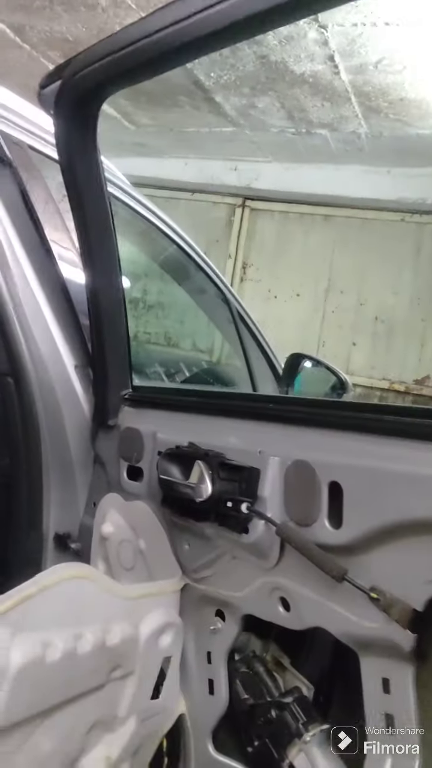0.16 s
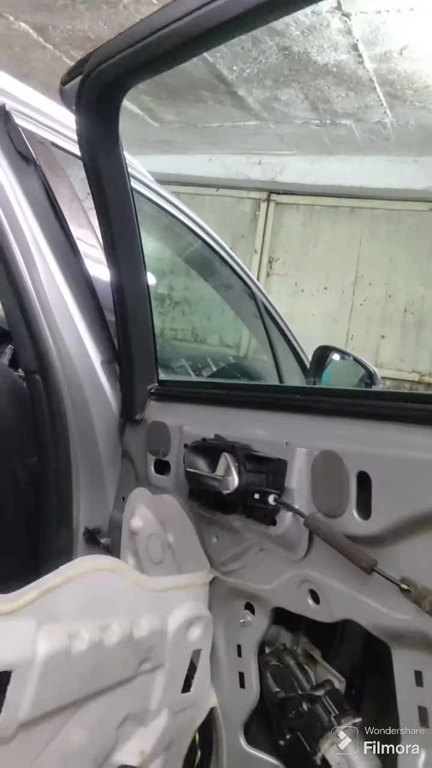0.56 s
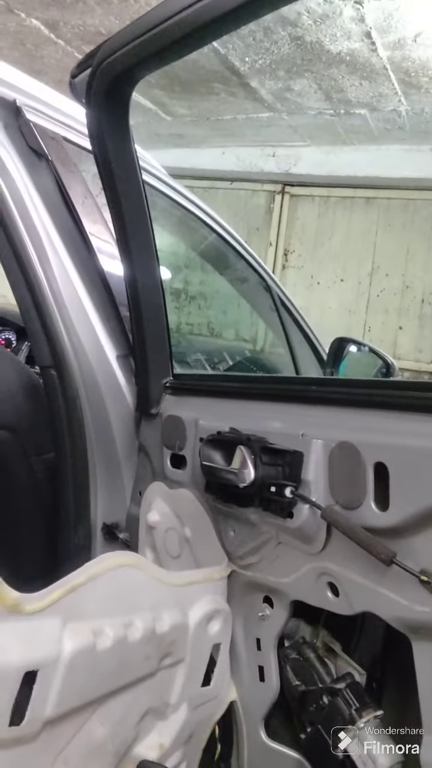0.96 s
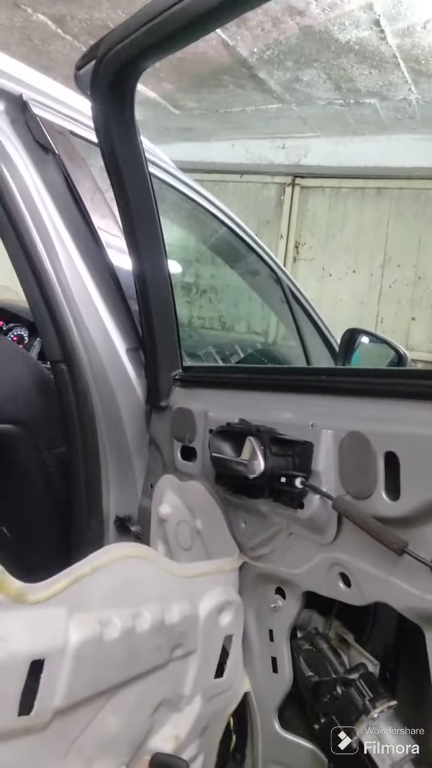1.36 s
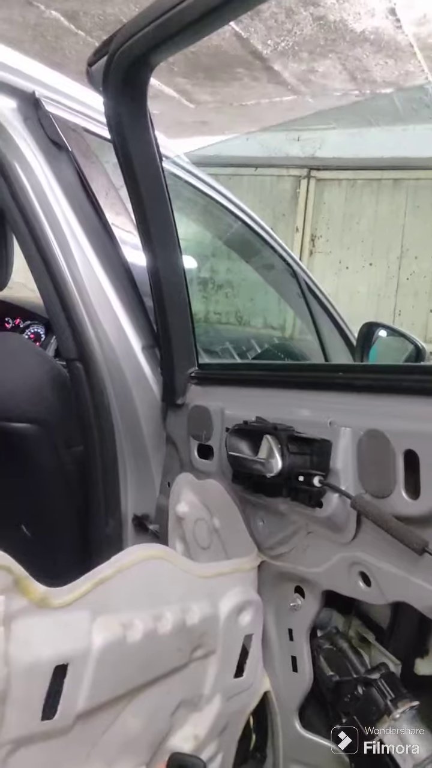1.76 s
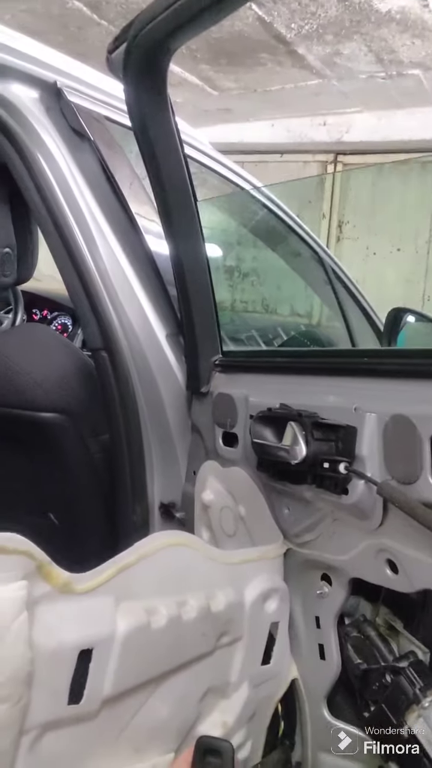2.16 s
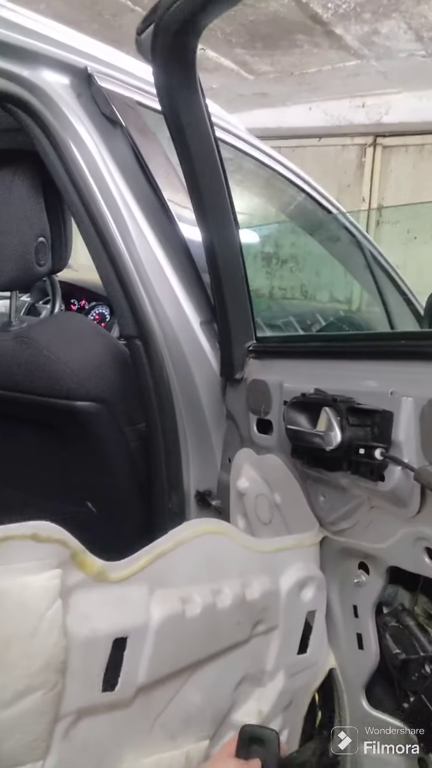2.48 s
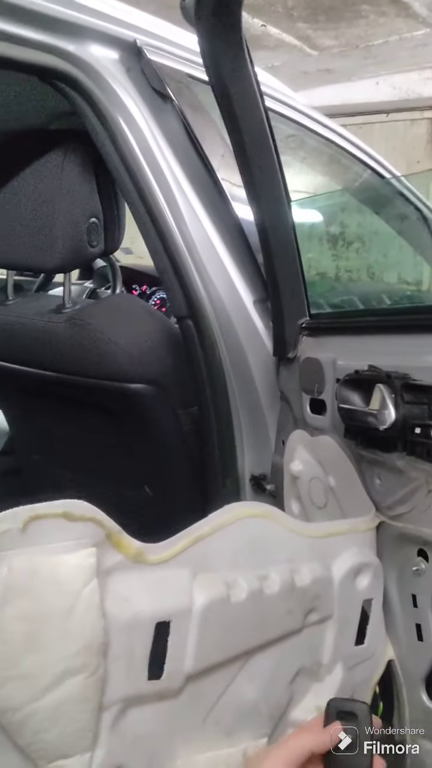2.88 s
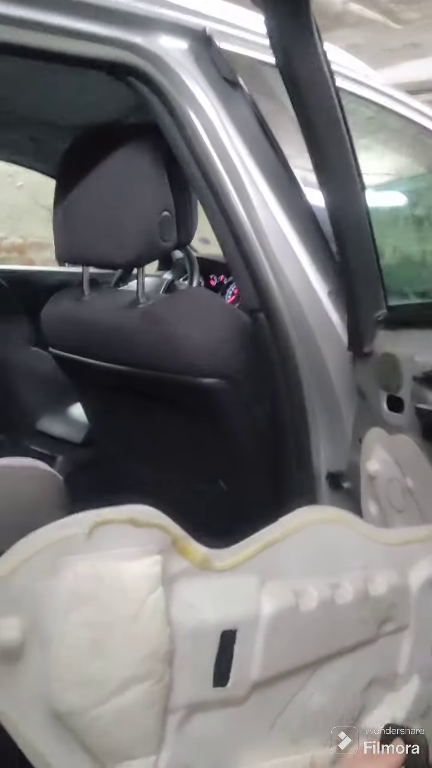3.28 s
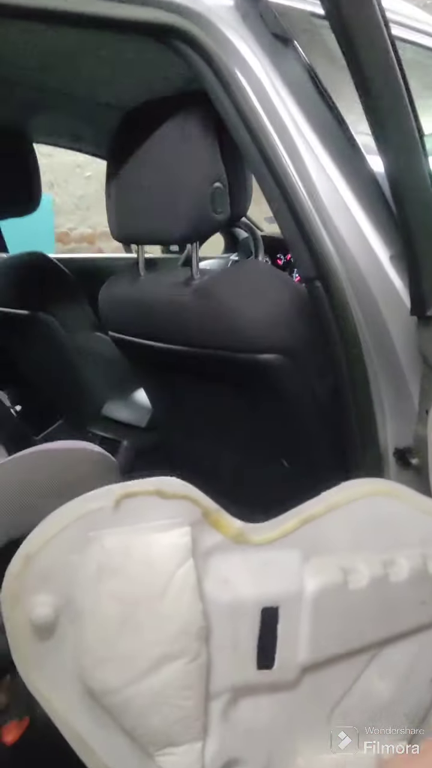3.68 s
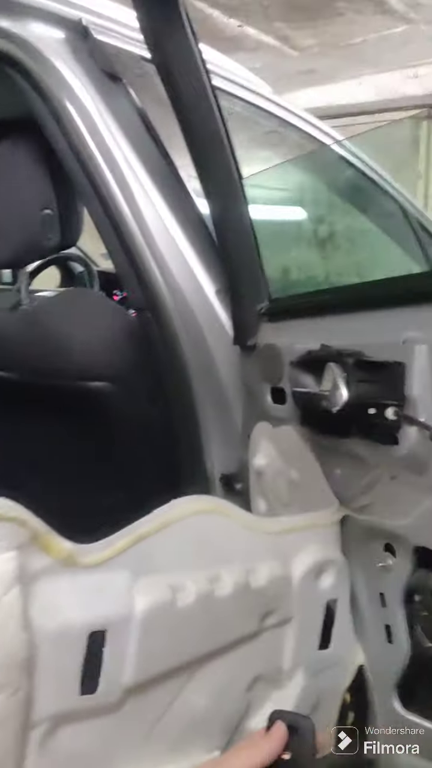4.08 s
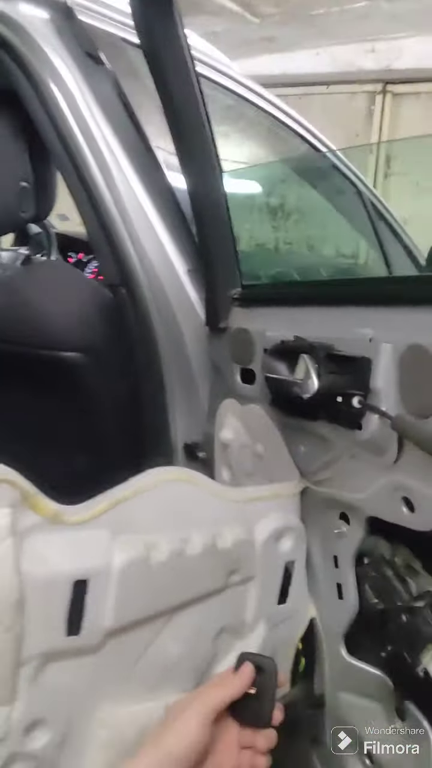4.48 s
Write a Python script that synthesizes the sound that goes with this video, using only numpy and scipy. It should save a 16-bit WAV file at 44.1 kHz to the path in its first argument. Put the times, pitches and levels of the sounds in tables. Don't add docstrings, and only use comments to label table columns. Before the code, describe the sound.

Close to an open car door with its trim removed: a sharp click, a second with more body, then a resonant panel thump as the drive takes up slack. The electric motor whines and drones for about a second and a half, with glass rubbing in its seals. A snap and dull clunk end it; brief scuffs and tiny ticks follow in a quiet garage.

```python
import sys
import numpy as np
from scipy import signal
from scipy.fft import rfft, irfft, next_fast_len
from scipy.io import wavfile
from scipy.ndimage import uniform_filter1d, map_coordinates

SR = 44100
rng = np.random.default_rng(int(sys.argv[2]) if len(sys.argv) > 2 else 0)


def file_out(sig):
    cols = np.atleast_2d(sig).T
    lim = np.clip(cols, -1, 1)
    pcm = np.round(lim * 32767).astype(np.int16)
    wavfile.write(sys.argv[1], SR, pcm)


def attenuation_scalar(level_db):
    decades = np.asarray(level_db, float) / 20
    return 10 ** decades


N = 204121
TIME = np.arange(N) / SR


def unit(x):
    return x / np.sqrt(np.mean(x ** 2) + 1e-20)


def along(points, hz):
    f, v = np.transpose(points)
    return np.interp(np.log(hz + 1), np.log(f + 1), v)


def curves(rows):
    s, *cols = np.transpose(rows)
    return [np.interp(TIME, s, c) for c in cols]


def wobble(rate):
    knots = rng.standard_normal(int(N * rate / SR) + 4)
    return map_coordinates(knots, [TIME * rate])


def filtered(x, response):
    m = next_fast_len(len(x) + 8192)
    spectrum = rfft(x, m) * response(np.fft.rfftfreq(m, 1 / SR))
    return irfft(spectrum, m)[:len(x)]


def resonances(modes):
    def response(f):
        return sum((-1) ** k * attenuation_scalar(db) * 1j * f * w / (c * c - f * f + 1j * f * w)
                   for k, (c, w, db) in enumerate(modes))
    return response


def noise(response, patchy_db=0):
    z = signal.stft(rng.standard_normal(N), nperseg=512)[2]
    field = uniform_filter1d(rng.standard_normal(z.shape), size=5, axis=0)
    field = uniform_filter1d(field, size=10, axis=1)
    patchy = signal.istft(z * attenuation_scalar(patchy_db * unit(field)), nperseg=512)[1][:N]
    return unit(filtered(patchy, response))


def swell(s, rise, t60, hold=0):
    t = np.maximum(TIME - s, 0)
    return (1 - np.exp(-(t / rise) ** 2)) * attenuation_scalar(-60 * np.maximum(t - hold, 0) / t60)


# start_s, turns_per_s
ARMATURE_SPEED = [(1.32, 89.2), (1.56, 86.9), (1.75, 86.3), (1.85, 83.7), (1.945, 85.4), (2.04, 84.2),
                  (2.16, 84.8), (2.27, 83.1), (2.66, 85.4)]
# start_s, load_db
SEAL_DRAG = [(1.32, 0.5), (1.37, 0.5), (1.65, -2), (1.8, 0), (1.92, 0.5), (2.2, 0), (2.3, 0), (2.57, -1),
             (2.64, 0)]
# turn_multiple, glass_high_db, glass_low_db
SHAFT_ORDERS = [(2, -68, -75), (3, -60, -64), (4, -63, -64), (5, -62, -70), (6, -68, -63), (7, -68, -68),
                (8, -70, -64), (9, -59, -69), (10, -66, -61), (11, -71, -65), (13, -69, -69),
                (19, -74, -69), (21, -72, -67)]
# bar_rate_multiple, level_db
COMMUTATOR = [(2, -67), (3, -72), (4, -67), (5, -67), (6, -69), (7, -68.5), (9, -79), (10, -83),
              (12.5, -79), (13, -83)]
# pitch_hz, level_db_per_hz
DOOR_DRONE = [(65, -11), (110, 1), (129, -17.5), (248, -0.5), (393, -5), (508, -4), (559, -8), (855, -3.5),
              (1200, -9.5), (1730, -12), (2000, -12.5), (2600, -41), (4400, -120)]
# pitch_hz, level_db_per_hz
SEAL_HISS = [(710, -32), (1200, -11), (1790, -6.5), (1970, -6), (3410, -8.5), (3840, -8.5), (4270, -10),
             (5530, -13), (6290, -9), (7470, -15), (11500, -14), (15700, -19)]


def motor():
    load_db, = curves(SEAL_DRAG)
    drone_db, hiss_db = -54 + 2.95 * load_db, -53.85 + load_db
    speed = curves(ARMATURE_SPEED)[0] * (1 + 0.0008 * wobble(40))
    turn = 2 * np.pi * np.cumsum(speed) / SR
    lowered = np.clip((TIME - 1.65) / 0.42, 0, 1)

    def order(k, db, flutter_db):
        phase = rng.uniform(0, 2 * np.pi)
        return attenuation_scalar(db + flutter_db * wobble(7.15)) * np.sin(k * turn + phase)

    gear = 0
    for k, high_db, low_db in SHAFT_ORDERS:
        level_db = high_db + (low_db - high_db) * lowered + 1.5
        gear = gear + order(k, level_db, 3) * attenuation_scalar(2.5 * wobble(30))
    bars = 0
    for k, db in COMMUTATOR:
        bars = bars + order(10 * k, db + 1.5, 2.3)
        bars = bars + order(10 * k + 1, db - 10, 4) + order(10 * k - 1, db - 11, 4)
    tones = gear + attenuation_scalar(2 + 0.8 * load_db) * bars

    throb = attenuation_scalar(np.sin(turn))
    drone = attenuation_scalar(drone_db) * throb * noise(lambda f: attenuation_scalar(along(DOOR_DRONE, f)), patchy_db=1.0)
    seal_colour = lambda f: attenuation_scalar(along(SEAL_HISS, f))
    seals = throb * noise(seal_colour, patchy_db=3.5)
    grind = unit(filtered(rasp(turn), seal_colour))
    rails = resonances([(8550, 500, 0), (10500, 500, 1), (11300, 700, -1), (12200, 900, -4)])
    sizzle = unit(filtered(rasp(turn) + 0.5 * noise(np.ones_like, patchy_db=2.0), rails))
    hiss = attenuation_scalar(hiss_db) * (0.7 * seals + 0.44 * grind + 0.36 * lowered * sizzle)

    powered = np.clip((TIME - 1.104) / 0.05, 0, 1) * attenuation_scalar(-60 * np.maximum(TIME - 2.66, 0) / 0.1)
    at_speed = np.clip((TIME - 1.2) / 0.076, 0, 1)
    loose_s = np.maximum(TIME - 1.82, 0)
    shake_db = -63 + 10.5 * np.minimum(loose_s / 0.046, 1) + 3.5 * loose_s
    shaking = at_speed * attenuation_scalar(-60 * np.maximum(TIME - 2.72, 0) / 0.28)
    return powered * (drone + hiss + at_speed * tones) + shaking * order(1, shake_db, 2.3)


def rasp(turn):
    bumps = rng.standard_normal((80, 360))
    degrees = turn / (2 * np.pi) % 1 * 360
    return map_coordinates(bumps, [TIME * 12, degrees], order=1, mode="grid-wrap")


# start_s, peak_db, door_thump_db, brightness_db_per_octave, own_ring_hz
RELAY_SNAPS = [
    (0.3778, -26, -16, 1.5, 10420),
    (0.7722, -30, -4, 0, 4120),
    (1.1046, -25.5, -3.5, -2.5, 3250),
    (2.6537, -26.5, -16.5, -5, 5020),
]
# start_s, peak_db, own_ring_hz
ARMATURE_LIFTS = [
    (0.3565, -47.5, 2910),
    (1.0811, -48.5, 2430),
]
# start_s, peak_db, own_ring_hz
SMALL_TICKS = [
    (0.5321, -62, 3700),
    (3.4363, -71, 2010),
    (4.0187, -71, 3580),
    (4.0468, -69, 2480),
    (4.111, -50.5, 2260),
    (4.1709, -71, 3620),
]
# pitch_hz, width_hz, level_db
RELAY_HOUSING = [(1950, 400, -5), (3100, 500, -1), (4050, 450, -1), (5050, 450, -3), (6500, 900, -3),
                 (8050, 500, -5), (10550, 900, -10), (14000, 2200, -5)]
# pitch_hz, level_db, t60_s
DOOR_MODES = [(280, 1, 0.12), (375, -7, 0.32), (624, -5, 0.14), (752, -11.5, 0.1663), (1480, -16, 0.063)]
# pitch_hz, width_hz, level_db
DOOR_SKIN = [(208, 60, 4), (253.2, 24, 8.5), (314.7, 51, 6), (496, 440, -10.5), (592, 54, -14),
             (760, 96, -12), (1063, 300, -10), (1372, 110, -12.5), (1658, 230, -11), (1900, 120, -14),
             (2920, 870, -25.5)]


def contacts():
    out, t = np.zeros(N + SR), np.arange(SR // 2) / SR
    peak = lambda x: x / np.abs(x).max()
    hit = lambda envelope, response: filtered(envelope * rng.standard_normal(len(t)), response)
    rows = [(s, db, thump, tilt, 0.06 - 0.0058 * thump, hz) for s, db, thump, tilt, hz in RELAY_SNAPS]
    rows += [(s, db, -26, -8, 0.12, hz) for s, db, hz in ARMATURE_LIFTS]
    rows += [(s, db, -12, -4.5, 0.14, hz) for s, db, hz in SMALL_TICKS]
    for s, db, thump_db, tilt_db, t60, hz in rows:
        tilt = lambda f: attenuation_scalar(tilt_db * np.log2(np.clip(f, 900, None) / 4000)) * f / (f + 1200)
        own = resonances([(hz, 0.039 * hz, 6)])
        snap = attenuation_scalar(-60 * t / 0.015)
        crack = hit(snap, lambda f: resonances(RELAY_HOUSING)(f) * tilt(f) + own(f))
        tail = attenuation_scalar(-12.5 - 60 * t / t60) * (1 - np.exp(-t / 0.00135))
        crack = crack + hit(tail, lambda f: 0.32 * tilt(f) + 0.2 * own(f))
        ring = 0
        for mode_hz, level_db, life_s in DOOR_MODES:
            decay = attenuation_scalar(level_db + rng.normal(0, 1.0) - 60 * t / life_s)
            ring = ring + decay * np.sin(2 * np.pi * mode_hz * t + rng.uniform(0, 2 * np.pi))
        rattle = hit(attenuation_scalar(-60 * t / 0.16) * (1 - np.exp(-t / 0.01404)), resonances(DOOR_SKIN))
        thump = peak(rattle) + attenuation_scalar(-1.5) * ring * (1 - np.exp(-t / 0.01))
        out[round(s * SR):][:len(t)] += attenuation_scalar(db - 1) * peak(crack) + attenuation_scalar(db + thump_db + 2.5) * thump
    return out[:N]


# start_s, peak_db, pitch_hz, t60_s
PANEL_KNOCKS = [(1.104, -34, 326.7, 0.046), (1.117, -27.5, 210, 0.23), (1.124, -36, 760, 0.25),
                (1.12, -27.5, 283, 0.14), (1.139, -27.5, 256, 0.16), (1.145, -32.5, 524, 0.077),
                (1.148, -24, 60, 0.21), (1.159, -28.5, 760, 0.063), (1.23, -32.5, 253, 0.082),
                (1.264, -36, 65.4, 0.17), (2.665, -31.5, 685, 0.095), (2.666, -31, 976, 0.038),
                (2.68, -31.5, 767, 0.063), (2.697, -32.5, 238, 0.12), (2.731, -35, 387, 0.026),
                (2.743, -42, 55.1, 0.13), (4.11, -57, 2356, 0.061), (4.12, -64.5, 330, .12),
                (4.281, -54, 569, 0.024)]


def knocks():
    out = 0
    for s, db, hz, t60 in PANEL_KNOCKS:
        envelope = swell(s, 0.0026 + 0.024 * t60, t60)
        out = out + attenuation_scalar(db) * envelope * np.sin(2 * np.pi * hz * (TIME - s))
    return out


# start_s, peak_db,
# t60_s, centre_hz
GRAINY_BURSTS = [(0.376, -41.5, 0.079, 5600), (.381, -42, 0.12, 2034), (.775, -33.5, 0.04, 1325),
                 (1.107, -43, 0.54, 487), (1.123, -39.5, 0.21, 1300), (1.14, -33, 0.084, 2070),
                 (1.144, -28.5, 0.075, 1210), (1.15, -35, 0.24, 527), (1.165, -47.5, 0.47, 2550),
                 (1.207, -41.5, 0.36, 2960), (1.221, -35, 0.12, 3060), (1.241, -34.5, 0.075, 2060),
                 (1.283, -47, 0.26, 3320), (2.66, -36.5, 0.14, 1070), (2.674, -41, 0.28, 503),
                 (3.27, -80.5, 0.28, 2480), (3.288, -69, 0.21, 883), (3.433, -78, .2, 2780),
                 (4.018, -78, 0.34, 2800), (3.511, -75, .53, 350), (4.115, -71.5, 0.11, 1013)]
# start_s, peak_db, t60_s, centre_hz
NARROW_SQUEAKS = [
    (.534, -72.5, .2, 3650),
    (.55, -70, 0.18, 2660),
    (1.081, -43.5, 0.066, 2640),
    (4.118, -80.5, 0.16, 6270),
    (4.118, -79, 0.17, 12500),
]


def slips():
    rows = [(*row, 1.07, 0.0035) for row in GRAINY_BURSTS]
    rows += [(*row, 0.16, 0.0006) for row in NARROW_SQUEAKS]
    out = 0
    for s, db, t60, hz, width, rise in rows:
        band = resonances([(hz, 1.5 * width * hz, 0)])
        rub = noise(lambda f: band(f) ** 2 / (1 + (f / (3 * hz)) ** 2), patchy_db=1.0)
        grain = attenuation_scalar(2 * wobble(250))
        out = out + attenuation_scalar(db) * grain * swell(s, rise + 0.013 * t60, t60) * rub
    return out


# start_s, level_db, rise_s, hold_s, top_hz
SCUFF_STROKES = [
    (2.758, -57.5, .017, .042, 9000),
    (2.838, -55.5, .007, .058, 16000),
    (2.925, -60, .012, .02, 3000),
]
# pitch_hz, width_hz, level_db
SCUFFED_SURFACE = [(497, 1300, -4), (1230, 520, -4), (1650, 170, 2), (2490, 680, -5), (3360, 910, -5),
                   (4400, 600, -10), (5140, 350, -7), (6700, 3200, -17.5), (12600, 2400, -28)]


def scuff():
    def body(f):
        return np.sqrt(sum(np.abs(resonances([(c, w, db / 2)])(f)) ** 4 for c, w, db in SCUFFED_SURFACE))

    out = 0
    for s, db, rise, hold, top_hz in SCUFF_STROKES:
        press = swell(s, rise, 0.24, hold=rise + hold)
        low = noise(lambda f: body(f) / (1 + (f / 2900) ** 8), patchy_db=1.5)
        high = noise(lambda f: body(f) / (1 + (2900 / (f + 1)) ** 8), patchy_db=0.5)
        high = filtered(high, lambda f: 1 / (1 + (f / top_hz) ** 4))
        out = out + attenuation_scalar(db) * (press * low + attenuation_scalar(-7.5) * press ** 1.5 * high)
    return attenuation_scalar(wobble(90)) * out


# pitch_hz, level_db_per_hz
ROOM_FLOOR = [(12, -48), (20, -21), (45, 7), (100, -7), (211, -9), (339, -15.5), (461, -23), (983, -27.5),
              (2000, -32.5), (4000, -37), (6000, -42), (8500, -48.5), (11000, -45.5), (14500, -39)]
# middle_s, level_db, half_length_s
RUMBLE_SWELLS = [(0.073, -61, 0.057), (0.43, -58, 0.2), (.7, -55.5, 0.064), (0.944, -53, 0.11),
                 (1.205, -45, 0.086), (1.435, -51, 0.097), (1.9, -58.5, 0.26), (2.553, -61, 0.22),
                 (2.773, -51, .055), (3.003, -58.5, 0.065)]
# pitch_hz, level_db
ELECTRONIC_WHISTLE = [(1001, -89), (1997, -93), (2998, -100), (3994, -91.5), (4996, -96.5)]


def garage():
    floor = attenuation_scalar(-67 + 1.2 * wobble(3)) * noise(lambda f: attenuation_scalar(along(ROOM_FLOOR, f)), patchy_db=1)
    swells = attenuation_scalar(-75)
    for middle, db, half in RUMBLE_SWELLS:
        swells = swells + attenuation_scalar(db) * np.exp(-((TIME - middle) / half) ** 2)
    hum = swells * np.sin(2 * np.pi * np.cumsum(46.5 + 1.2 * wobble(9.4)) / SR)
    whistle = 0
    for hz, db in ELECTRONIC_WHISTLE:
        whistle = whistle + attenuation_scalar(db + 2 + 1.5 * wobble(3)) * np.sin(2 * np.pi * hz * TIME)
    return floor + hum + whistle


def scene():
    return (motor() + contacts() + knocks() + slips() + scuff() + garage())[None]


def top_cut(x):
    return signal.sosfilt(signal.butter(12, 16500, fs=SR, output="sos"), x)


def record(dry):
    limited = filtered(dry[0], lambda f: attenuation_scalar(-25 * np.clip((f - 15650) / 350, 0, 1)))[None]
    return top_cut(limited)


dry = scene()
out = record(dry)
file_out(out)
```